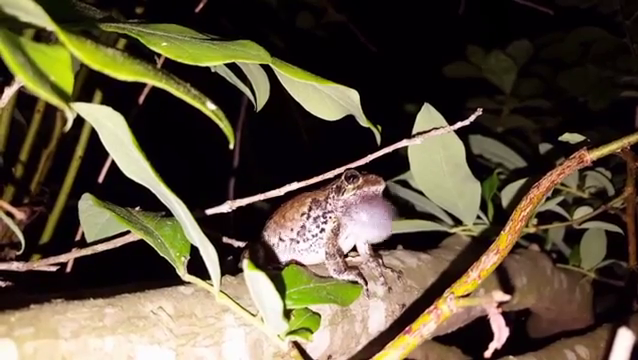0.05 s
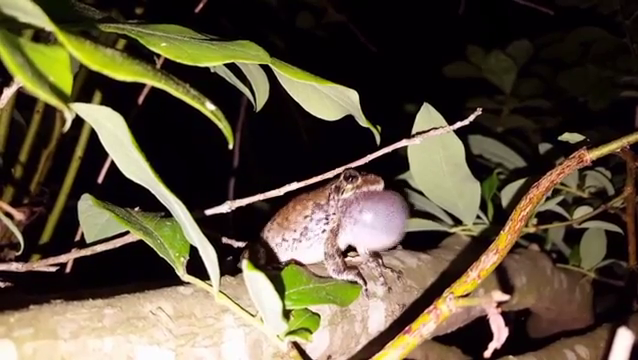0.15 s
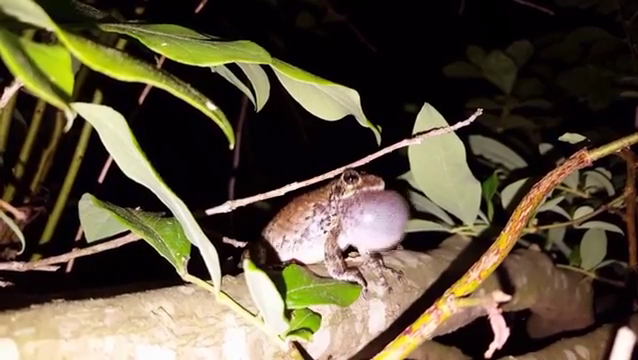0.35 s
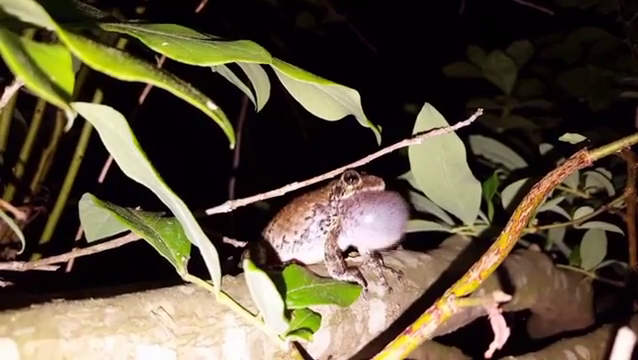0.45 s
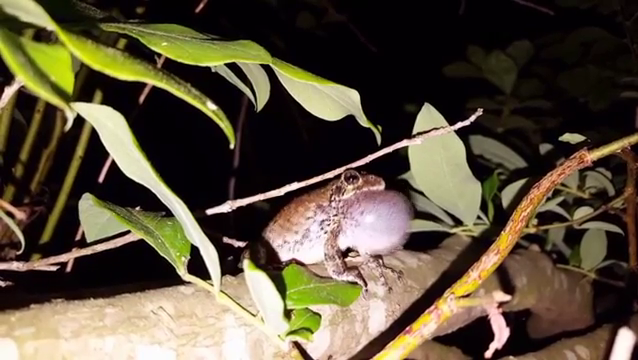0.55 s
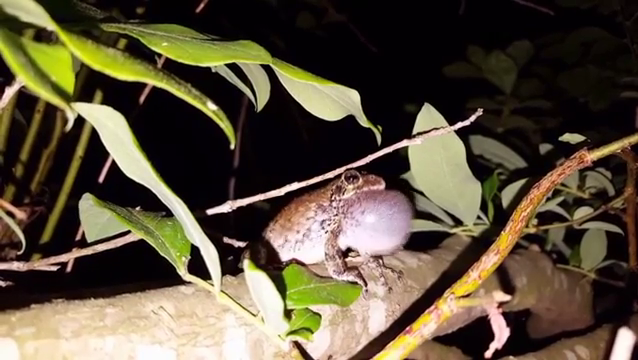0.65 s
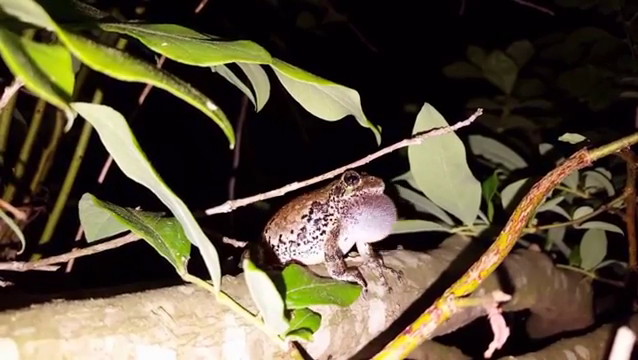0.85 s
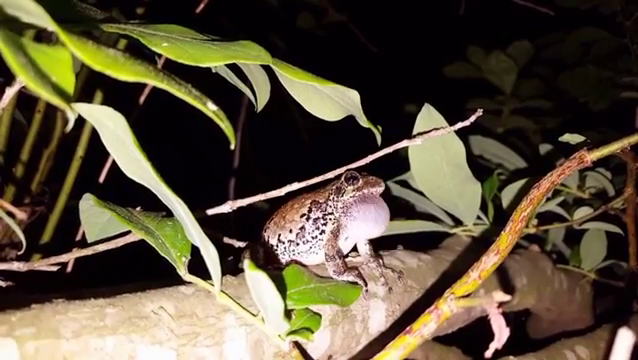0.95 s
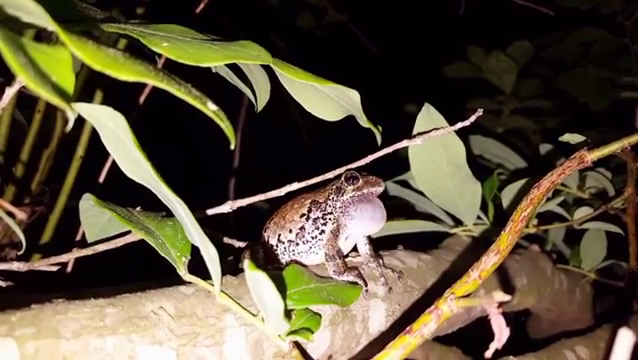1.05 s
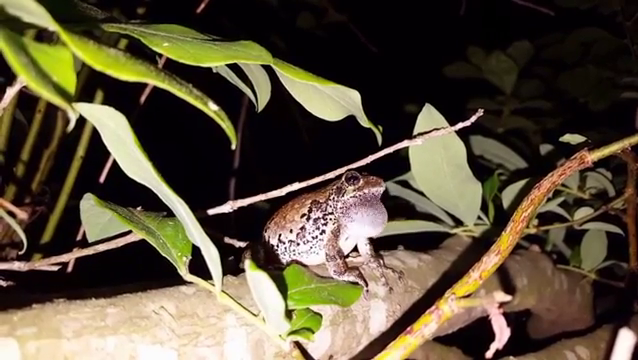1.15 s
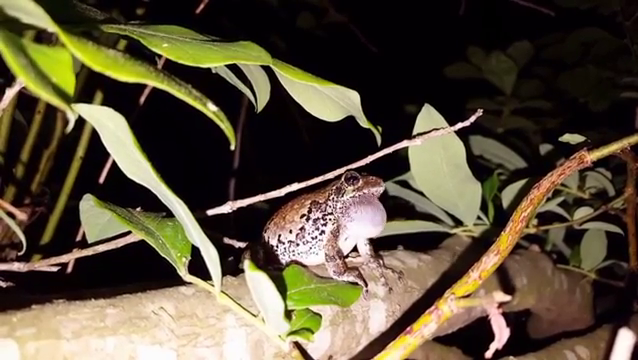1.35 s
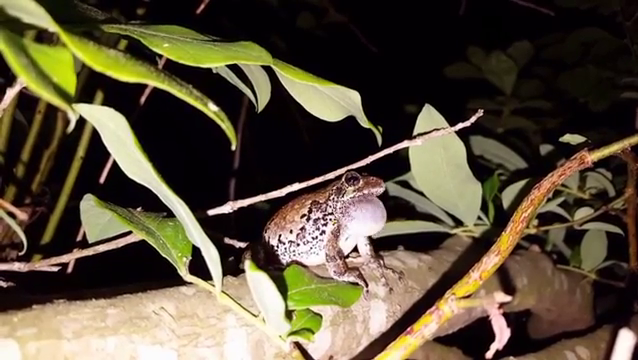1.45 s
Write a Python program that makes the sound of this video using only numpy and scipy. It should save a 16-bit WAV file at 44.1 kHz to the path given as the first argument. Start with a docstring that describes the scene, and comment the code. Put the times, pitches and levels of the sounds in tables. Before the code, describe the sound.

A close tree frog gives one loud pulsed trill, with faint frogs behind.

```python
"""Tree frog at night

A close frog on a branch gives one trill of thirteen pulses, each a rising tone with a rough start.
The throat sac swells the octave; twigs and leaves scatter the call. A neighbour, a far frog and a
chorus trill across the pond over a low rumble. This background sinks as the recorder's gain drops
during the loud call, and the loudest pulse overloads the recorder."""
import sys
import numpy as np
from scipy import signal
from scipy.fft import rfft, irfft
from scipy.io import wavfile
from scipy.ndimage import uniform_filter1d

SR = 44100
rng = np.random.default_rng(int(sys.argv[2]) if len(sys.argv) > 2 else 0)


def master(y):
    """Save y as 16-bit WAV."""
    cut = np.clip(np.atleast_2d(y).T, -1, 1)
    pcm = np.round(cut * 32767)  # scale
    wavfile.write(sys.argv[1], SR, pcm.astype(np.int16))


N = 66150


def undb(db):
    """Decibels to gain."""
    return 10 ** (np.asarray(db) / 20)


def level(x, rms_db):
    """Scale to an rms level."""
    return x * undb(rms_db) / np.sqrt(np.mean(x ** 2))


def fader(t, points):
    """Gain curve through (time_s, gain_db) points."""
    return undb(np.interp(t, *np.array(points).T))


def colour(x, points):
    """Filter by (freq_hz, gain_db) points."""
    hz, db = np.array(points, float).T
    bins_hz = np.maximum(np.arange(N // 2 + 1) * SR / N, 1)
    return irfft(rfft(x) * undb(np.interp(np.log(bins_hz), np.log(hz), db)), N)


def flutter(rate_hz):
    """Smooth random wander, rms 1."""
    span = max(int(SR / rate_hz), 1)
    return level(uniform_filter1d(uniform_filter1d(rng.standard_normal(N), span), span), 0)


def swell(t, rise_s, fall_s):
    """Lopsided bell, peak at t = 0."""
    return np.exp(-.5 * (t / np.where(t < 0, rise_s, fall_s)) ** 2)


def microphones(x, lag_s, right_db):
    """Stereo pair: right lags by lag_s and is louder by right_db."""
    bins_hz = np.arange(N // 2 + 1) * SR / N
    shifted = irfft(rfft(x) * np.exp(-2j * np.pi * bins_hz * lag_s), N)
    return np.array([x * undb(-right_db / 2), shifted * undb(right_db / 2)])


def scatter(x, t60_s):
    """Diffuse tail of unit energy, different in each channel."""
    t = np.arange(N) / SR
    tail = rng.standard_normal((2, N)) * undb(-60 * t / t60_s) * np.clip(t / .004, 0, 1)
    tail /= np.sqrt(np.sum(tail ** 2, axis=1, keepdims=True))
    return signal.fftconvolve(x[None], tail, axes=1)[:, :N]


def night_air(t):
    """Low rumble and faint hiss, partly shared by the microphones."""
    # air spectrum: freq_hz, density_db
    spectrum = [(20, 6), (60, -1.5), (120, -3.5), (200, -2), (350, -2), (550, -10), (1500, -10.5),
                (3200, -13), (3600, -17), (4200, -32), (7500, -27.5), (10000, -53.5), (15500, -43)]
    # recorder's gain on the air, dropping during the call: time_s, gain_db
    recorder_gain = [(0, 7.5), (.2, 8.5), (.35, 5), (.6, -1), (.95, -4), (1.2, -2), (1.5, -2.5)]
    noise = rng.standard_normal(N) + 0.97 * rng.standard_normal((2, N))
    return fader(t, recorder_gain) * level(colour(noise, spectrum), -62)


def trill(t, pulses, pitch_hz, partials_db, sweep_hz_per_s, width_s):
    """A distant frog's rising pulses: the fundamental lasts longest, partials 3 and 4 crest last."""
    out = np.zeros(N)
    for crest_s, gain_db in pulses:
        on = abs(t - crest_s) < 5 * width_s
        offset_s = t[on] - crest_s
        phase = 2 * np.pi * (pitch_hz * offset_s + sweep_hz_per_s * offset_s ** 2 / 2 + rng.random())
        for k, partial_db in enumerate(partials_db, 1):
            span_s = 1.66 * width_s if k == 1 else width_s
            envelope = swell(offset_s - 0.0013 * (k > 2), span_s, span_s)
            out[on] += undb(gain_db + partial_db) * envelope * np.sin(k * phase)
    return out


def chorus(t):
    """Six frogs, each at its own pitch and pulse rate, smeared by distance."""
    centre_hz, rate_hz = 997.3, 20
    out = 0
    for detune, haste, offset in rng.uniform(-1, 1, (6, 3)):
        crests_s = np.arange(offset / rate_hz, t[-1], 1 / (rate_hz * (1 + 0.13 * haste)))
        voice = trill(t, [(s, 0) for s in crests_s], pitch_hz=centre_hz * (1 + .025 * detune),
                      partials_db=[-6.5, 7, -20, -30], sweep_hz_per_s=8000, width_s=0.0086)
        out += microphones(voice, lag_s=-0.00023, right_db=5.5) + undb(3.5) * scatter(voice, t60_s=1)
    return level(out, -48)


def pond_frogs(t):
    """A far frog and a nearer neighbour stand out from the chorus."""
    # far frog's pulses: crest_s, gain_db
    far_pulses = [(.035, -49), (.088, -52), (.128, -50), (.172, -47), (1.265, -48.5), (1.317, -46.5),
                  (1.365, -47.5), (1.414, -44.5), (1.468, -41.5)]
    # neighbour's pulses: crest_s, gain_db
    near_pulses = [(0.906, -37), (0.953, -38.5), (.998, -37.5), (1.044, -37.5), (1.090, -37.5),
                   (1.136, -37.5), (1.186, -37.5)]
    # recorder's gain on the pond, dropping during the call: time_s, gain_db
    recorder_gain = [(0, 12.5), (.2, 10), (.35, 9.5), (.9, 3.5), (1.2, 3), (1.5, -3)]
    near = trill(t, near_pulses, pitch_hz=897.6, partials_db=[-17.5, 3.5, -18, -33.5],
                 sweep_hz_per_s=8200, width_s=0.0043)
    far = trill(t, far_pulses, pitch_hz=1005, partials_db=[-4.5, 6.5, -27, -50],
                sweep_hz_per_s=7100, width_s=0.0021)
    direct = microphones(near, lag_s=-0.00027, right_db=7)
    direct += microphones(far, lag_s=-0.000094, right_db=5)
    return fader(t, recorder_gain) * (direct + chorus(t) + undb(-9.5) * scatter(near + far, t60_s=.15))


def tree_frog(t):
    """Pulses glide up and settle from rough to clean; the sac's octave swells and snaps off."""
    # call pulses, crest and dip timed from the start: start_s, length_s, pitch_hz, sweep_hz_per_s,
    # fundamental_db, octave_db, overtones_db, crest_s, rise_s, fall_s, dip_s, dip_depth
    pulses = [(0.203, 0.03, 1000, 14570, -11.5, -5.5, -35.5, 0.015, 0.0079, 0.0086, 0.0062, 0.92),
              (0.251, 0.032, 995, 11320, -14, 0, -32.5, 0.021, 0.0075, 0.0047, 0.016, 0.29),
              (0.302, 0.029, 1005.0, 10200, -17, -2, -35.5, 0.018, 0.0043, 0.0052, 0.0039, 0),
              (0.356, 0.033, 1017, 10150, -18, -0.5, -39.5, 0.025, 0.0091, 0.0023, 0.023, 0.88),
              (0.407, 0.032, 1018, 8360, -19.5, 1, -39.5, 0.018, 0.0028, 0.0057, 0.019, 0.9),
              (0.463, 0.038, 1034, 8310, -18.5, -2, -42, 0.029, 0.01, 0.0012, 0.0259, 0.74),
              (0.518, 0.0282, 993, 8070, -18.5, -2.5, -38.5, 0.018, 0.0062, 0.0086, 0.013, 0.3),
              (0.5752, 0.033, 1045, 8980, -21, -3.5, -45, 0.022, 0.0067, 0.0051, 0.023, 0.9),
              (0.6292, 0.037, 1009, 7776, -21, -2.5, -42, 0.021, 0.0085, 0.004, 0.0086, 0.8),
              (0.683, 0.034, 1011, 9000.0, -19, -3, -39.5, 0.025, 0.0094, 0.0037, 0.0054, 0.52),
              (0.74, 0.034, 1029, 8700, -18.5, -2.5, -38.2, 0.022, 0.0072, 0.0051, 0.014, 0.0),
              (0.7943, 0.03, 1029, 9500, -20.5, -3, -40, 0.018, 0.0043, 0.0063, 0.022, 0.72),
              (0.849, 0.0326, 1009, 8400.0, -21, -2, -41.5, 0.02, 0.0056, 0.0039, 0.018, 0.24)]
    # small body, radiating no bass: freq_hz, gain_db
    body = [(100, -36), (450, -2.5), (620, -7), (760, 2.5), (1000, -0.5), (1400, -2), (2100, 0.5),
            (3100, 1.5), (3500, -1), (4000, 1), (4700, -7.5), (15000, -8.5)]
    # colour of the upper overtones: freq_hz, gain_db
    buzz_colour = [(2500, -17), (3500, 4), (4500, -7), (5500, -6), (6800, -9), (7900, 5.5), (9200, -24),
                   (10200, -38), (11500, -17.5), (12800, -29.5), (14200, -7.5), (15500, -28.5)]
    # colour of the rasp between overtones: freq_hz, gain_db
    rasp_colour = [(500, -20.5), (1300, 11.5), (2600, -5), (3600, -4), (4500, -6), (5600, -15.5),
                   (6800, -13), (7900, -11), (9200, -10.5), (10200, -34.5), (11500, -12.5), (12800, -26),
                   (14200, -8.5), (15500, -21.5)]
    lowest_hz, highest_hz, pivot_s, push_db_per_s = 889, 1201, .018, 124.5
    attack_s, release_s, rough_s = 0.018, .0026, .011
    sac_open_s, snap_s, dip_width_s, octave_hold = 0.0027, .0011, 0.0027, 0.077
    tone, buzz, rasp = np.zeros((3, N))
    jitter, shake, hiss = flutter(900), flutter(330), rng.standard_normal(N)
    waver, flicker = flutter(170), flutter(240)
    for (start_s, length_s, pitch_hz, sweep_hz_per_s, fundamental_db, octave_db, overtones_db,
         crest_s, rise_s, fall_s, dip_s, dip_depth) in pulses:
        on = (t >= start_s) & (t < start_s + 2 * length_s)
        age_s = t[on] - start_s
        rough = np.exp(-(age_s / rough_s) ** 2)
        glide_hz = np.clip(pitch_hz + sweep_hz_per_s * (age_s - pivot_s), lowest_hz, highest_hz)
        voice_hz = glide_hz * (1 + 0.0078 * waver[on]) * (1 + (0.0079 + 0.051 * rough) * jitter[on])
        phase = 2 * np.pi * np.cumsum(voice_hz) / SR
        voiced = np.clip(age_s / attack_s, 0, 1) ** .6 / (1 + np.exp((age_s - length_s) / release_s))
        fundamental = undb(fundamental_db + push_db_per_s * (age_s - pivot_s)) * voiced * np.sin(phase)

        sac = swell(age_s - crest_s, rise_s, fall_s) * np.minimum(age_s / sac_open_s, 1)
        sac /= 1 + np.exp((age_s - length_s + .001) / snap_s)
        dip = 1 - dip_depth * swell(age_s - dip_s, dip_width_s, dip_width_s)
        octave = undb(octave_db) * (sac + octave_hold * voiced) * dip * np.sin(2 * phase)

        # partials 3 and 4 flicker and die before the fundamental
        bright = undb(overtones_db) * voiced / (1 + np.exp((age_s - length_s + 0.0035) / .003))
        middle = undb(5.5) * np.sin(3 * phase) + undb(-3) * np.sin(4 * phase)
        middle *= bright * undb(3 * flicker[on])
        grain = 1 + .45 * rough * shake[on]
        tone[on] += grain * (fundamental + octave + middle)

        upper = sum(np.cos(k * phase) for k in range(5, 16))
        early_swell = swell(age_s - 0.01, rise_s=0.0048, fall_s=0.0057)
        buzz[on] += undb(0.63 * overtones_db - 24.5) * early_swell * upper
        rasp[on] += undb(-2.5) * bright * hiss[on] * (1 + np.cos(phase))
    return colour(tone, body), colour(buzz, buzz_colour) + colour(rasp, rasp_colour)


def in_bush(t, tone, buzz):
    """The call arrives direct and scattered by twigs and leaves, the treble most."""
    # buzz level, opening over the first pulses: time_s, gain_db
    opening = [(.22, -5.5), (.27, -2.5), (.37, 0), (.88, -0.5)]
    buzz = buzz * fader(t, opening)
    twigs = undb(2) * scatter(buzz, t60_s=.035)
    leaves = scatter(undb(-20) * tone + undb(-1) * buzz, t60_s=0.078)
    return microphones(tone + buzz, lag_s=.00008, right_db=0.68) + twigs + leaves


def scene():
    """Close frog over pond and night air."""
    t = np.arange(N) / SR
    tone, buzz = tree_frog(t)
    return in_bush(t, tone, buzz) + pond_frogs(t) + night_air(t)


def record(dry):
    """The recorder flattens the highest peaks unevenly, with a dull crackle, and cuts the top."""
    # colour of the overload distortion: freq_hz, gain_db
    crackle_colour = [(60, 9), (300, -0.5), (2100, 0.5), (4500, 1.5), (6500, 0), (10000, -5), (15000, -7)]
    skew, knee_power, top_hz = 0.011, 18, 15500
    ceiling = 1 - skew * np.sign(dry)
    clipped = dry / (1 + (dry / ceiling) ** knee_power) ** (1 / knee_power)
    overloaded = dry + colour(clipped - dry, crackle_colour)
    return signal.sosfilt(signal.ellip(10, .2, 80, top_hz, fs=SR, output="sos"), overloaded)


dry = scene()
out = record(dry)
master(out)
```